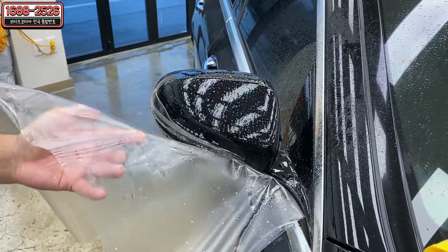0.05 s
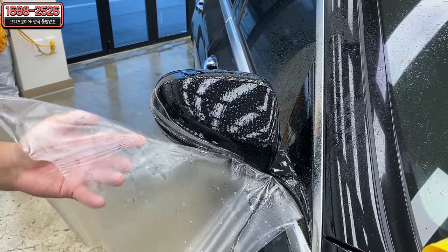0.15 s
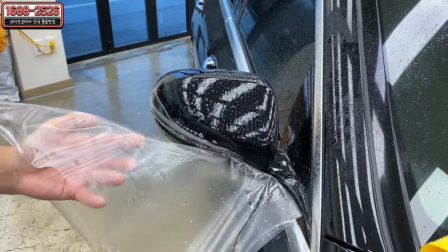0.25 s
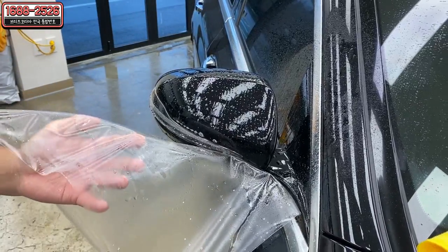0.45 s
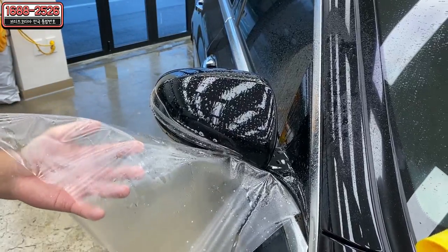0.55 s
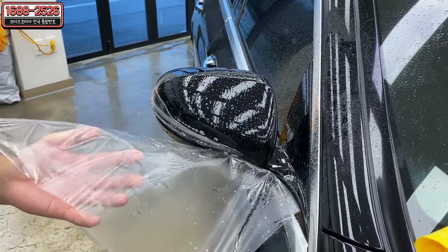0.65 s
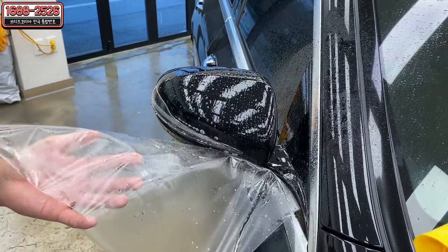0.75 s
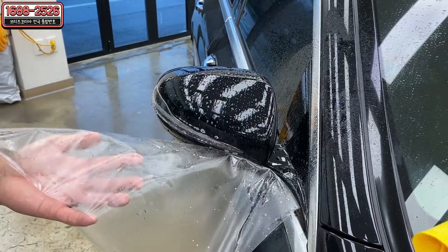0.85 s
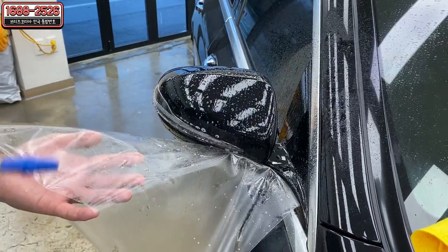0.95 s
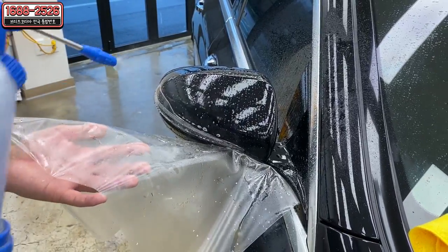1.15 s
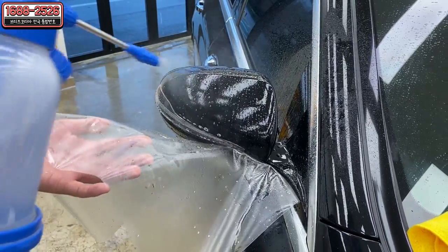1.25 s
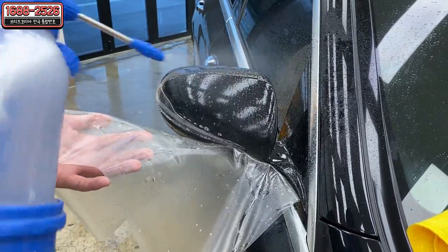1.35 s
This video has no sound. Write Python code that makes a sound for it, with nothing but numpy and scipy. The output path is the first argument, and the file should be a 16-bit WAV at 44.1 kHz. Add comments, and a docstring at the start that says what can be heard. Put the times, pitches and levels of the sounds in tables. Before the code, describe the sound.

Left of two close microphones, taut wet film pops twice and rustles with sharp ticks. The hall rings out over faint ventilation rumble, small soft flaps follow, and finally a spray hiss swells.

```python
"""A sheet of wet plastic film, pulled taut over a car door, pops twice, crinkles, rustles and softly flaps.
Pops are falling sweeps; creases and flaps are short sinking rings; wrinkles are filtered random clicks.
The place is a large, hard-walled workshop whose hall rings out as decaying noise; the film is to the left
of two microphones. Near the end a spray bottle starts to hiss as swelling filtered noise.
Ventilation rumble and faint hiss, both filtered noise, lie under everything."""
import sys
import numpy as np
from scipy import signal
from scipy.fft import rfft, irfft
from scipy.io import wavfile

SR = 44100
rng = np.random.default_rng(int(sys.argv[2]) if len(sys.argv) > 2 else 0)


def output_pcm(signal):
    """Save a mono or channel-first signal as 16-bit PCM at the path in sys.argv[1].

    Samples are clipped to [-1, 1] before scaling.
    """
    pcm = np.clip(np.atleast_2d(signal).T, -1, 1) * 32767
    wavfile.write(sys.argv[1], SR, np.round(pcm).astype(np.int16))


N = 61739
T = np.arange(N) / SR
HZ = np.maximum(np.fft.rfftfreq(2 * N, 1 / SR), 1)


def from_db(db):
    """Decibels to gain."""
    return 10 ** (np.asarray(db) / 20)


def rms_one(x):
    """Scale to unit power."""
    return x / np.sqrt(np.mean(x ** 2) + 1e-20)


def level(rows):
    """Gain over time from (time [s], level [dB]) rows."""
    return from_db(np.interp(T, *np.transpose(rows)))


def at_hz(points):
    """Read a table on a log-frequency axis."""
    f, value = np.transpose(points)
    return np.interp(np.log(HZ), np.log(f), value)


def shaped(x, gain):
    """Filter by a gain for each frequency."""
    return irfft(rfft(x, 2 * N) * gain)[..., :N]


def panned(db):
    """Left and right gains for a level difference."""
    return from_db(np.array([[.5], [-.5]]) * db)


def stereo_noise(likeness):
    """White noise whose two sides are alike as far as the table says."""
    alike = np.clip(at_hz(likeness), -.99, .99)
    mid, side = rng.standard_normal((2, N))
    mid = shaped(mid, np.sqrt((1 + alike) / 2))
    side = shaped(side, np.sqrt((1 - alike) / 2))
    return np.array([mid + side, mid - side])


def burst(start, decay, hz, q):
    """A dying run of tiny slips in one broad band; power 1 over its decay time."""
    age = np.maximum(T - start, 0)
    slips = rng.choice([-1, 1], N) * (age > 0) * np.exp(-np.minimum(age / decay, 20))
    half_width = np.exp(.5 / q)
    edges = np.clip([hz / half_width, hz * half_width], 20, SR / 2 - 20)
    band = signal.butter(2, edges, "band", fs=SR, output="sos")
    ring = signal.sosfilt(band, slips + 1e-18)
    return ring * np.sqrt(decay * SR / np.sum(ring ** 2))


# ventilation spectrum: (frequency [Hz], level [dB per Hz])
VENT_COLOUR = [(20, -8), (35, -7), (52, 3), (80, 2.5), (108, -1), (150, -15), (300, -21), (500, -20.5),
               (900, -50), (2000, -38), (8000, -48)]
VENT_DB = -54.5
# faint hiss spectrum: (frequency [Hz], level [dB per Hz])
AIR_COLOUR = [(60, 2), (200, 9.5), (1000, 3.5), (3000, -1.5), (6000, -3.5), (8300, -4), (10000, -4.5),
              (12000, -4.5), (14000, -6.5), (16000, -21)]
# faint hiss over time: (time [s], level [dB])
AIR_LEVEL = [(0, -58), (.19, -67), (.5, -59.5), (1.0, -58), (1.4, -63.5)]
# likeness of the two microphones, for the background and the hall: (frequency [Hz], likeness [-1 to 1])
HALL_LIKENESS = [(60, 1), (150, 0.92), (300, 0.66), (600, 0.0054), (1100, -0.069), (1700, 0.16),
                 (2200, 0.45), (3000, -0.2), (4400, 0.45), (5400, 0.15), (6600, 0.17), (9000, 0.21),
                 (14000, 0.73)]


def background():
    """Ventilation rumble and a faint hiss, both noise spread across the two microphones."""
    vent = rms_one(shaped(stereo_noise(HALL_LIKENESS), from_db(at_hz(VENT_COLOUR))))
    air = rms_one(shaped(stereo_noise(HALL_LIKENESS), from_db(at_hz(AIR_COLOUR))))
    return from_db(VENT_DB) * vent + level(AIR_LEVEL) * air


SPRAY_START_S, SPRAY_ATTACK_S = 1.2384, 0.026
SPRAY_DB, SPRAY_SWELL_DB_PER_S = -45, 14.5
# spray spectrum: (frequency [Hz], level [dB per Hz])
SPRAY_COLOUR = [(120, -11), (300, -9), (520, -1), (780, 3.5), (1100, -2), (2300, 0.5), (3500, -1.5),
                (4700, -4), (7500, -1.5), (9500, 1.5), (12000, -3.5), (15000, -2.5), (16000, -21)]
# spray place between the microphones: (frequency [Hz], left over right [dB])
SPRAY_PAN = [(300, 0), (800, 7), (1300, 4), (2400, 2), (3450, 6), (4400, 2.5), (5400, 2.5), (6600, 0.5),
             (15000, 0)]
# likeness of the spray at the two microphones: (frequency [Hz], likeness [-1 to 1])
SPRAY_LIKENESS = [(300, 0.54), (900, 0.74), (1600, 0), (2100, 0.4), (3200, -0.5), (4300, 0.85), (5100, .25),
                  (6600, 0.79), (14000, 1)]


def spray():
    """The valve opens and a smooth, swelling jet of mist hisses from the nozzle."""
    age = np.maximum(T - SPRAY_START_S, 0)
    opening = np.minimum(age / SPRAY_ATTACK_S, 1)
    flow = opening * from_db(SPRAY_DB + SPRAY_SWELL_DB_PER_S * age)
    colour = from_db(at_hz(SPRAY_COLOUR)) * panned(at_hz(SPRAY_PAN))
    return flow * rms_one(shaped(stereo_noise(SPRAY_LIKENESS), colour))


# reverberation time of the hall: (frequency [Hz], fall by 60 dB [s])
HALL_T60 = [(100, 0.6), (250, 0.83), (500, 1.1), (1200, 1.16), (2800, 1.08), (5500, 1.0), (9000, 0.57),
            (15000, 1.5)]
# hall spectrum: (frequency [Hz], level [dB])
HALL_COLOUR = [(60, 4.5), (150, 1.5), (350, -7), (610, 2.5), (800, -2), (1180, -0.5), (1450, 1), (1900, 3),
               (2250, 1.5), (2680, 1), (3200, 2), (4000, -1.5), (5200, 1), (7000, 0), (14000, -10)]
# hall balance at the microphones: (frequency [Hz], left over right [dB])
HALL_PAN = [(100, -2), (300, 0), (700, 2.5), (1700, 0), (2700, 2), (3500, 0), (5000, 4.5), (7000, 1.5),
            (9000, 0)]
HALL_BUILD_S = 0.0092


def hall(x):
    """A diffuse tail that builds up quickly and dies at its own rate in each band."""
    noise, response = rfft(stereo_noise(HALL_LIKENESS), 2 * N), 0
    centres, t60s = np.transpose(HALL_T60)
    for share, t60 in zip(np.eye(len(centres)), t60s):
        # neighbouring bands crossfade on the log-frequency axis
        band = irfft(noise * np.interp(np.log(HZ), np.log(centres), share))[:, :N]
        decay = np.exp(-np.log(1000) * T / t60) * (1 - np.exp(-T / HALL_BUILD_S))
        response = response + band * decay / np.sqrt(np.sum(decay ** 2))
    colour = from_db(at_hz(HALL_COLOUR)) * panned(at_hz(HALL_PAN))
    return shaped(x, rfft(response, 2 * N) * colour)


def grains(curve, colour, per_s, spread_db):
    """Small wrinkles click at random times, with random sizes and signs."""
    sizes = from_db(spread_db * np.minimum(rng.exponential(1, N), 3)) * rng.choice([-1, 1], N)
    clicks = sizes * (rng.random(N) < per_s / SR)
    return level(curve) * rms_one(shaped(clicks, from_db(at_hz(colour))))


# the film rustles as it moves: (time [s], level [dB])
RUSTLE = [(.195, -73), (.205, -32), (.26, -58), (.28, -39.5), (.32, -44.5), (.375, -39), (.41, -39.5),
          (.47, -53), (.62, -73), (.8, -75)]
# rustle spectrum: (frequency [Hz], level [dB per Hz])
RUSTLE_COLOUR = [(25, -25), (55, -9), (100, 8), (150, 5), (195, 6), (280, 1.5), (400, 1.5), (700, -2.5),
                 (1200, 5), (2000, -11), (3200, -12.5), (5000, -14), (7000, -18), (9500, -11.5),
                 (12000, -36), (16000, -52)]
# fine sizzle of the wet film: (time [s], level [dB])
SIZZLE = [(.31, -81), (.34, -54), (.365, -47), (.397, -42.5), (.42, -52), (.47, -74), (.6, -71)]
# sizzle spectrum: (frequency [Hz], level [dB per Hz])
SIZZLE_COLOUR = [(300, -48), (2000, -24), (6000, -16), (9500, 9), (12000, 13.5), (14500, 9), (16000, 8.5)]
GRAINS_PER_S, GRAIN_SPREAD_DB = 5000, 1  # rustle and sizzle
# coarser crackle as the sheet crumples: (time [s], level [dB])
CRACKLE = [(.27, -75.5), (.285, -51), (.34, -43.5), (.385, -50), (.42, -55), (.52, -52), (.65, -70)]
# crackle spectrum: (frequency [Hz], level [dB per Hz])
CRACKLE_COLOUR = [(200, -16), (900, 0), (2700, 6), (4500, 1), (7000, -3.5), (10000, -11), (13000, -36)]
CRACKLES_PER_S, CRACKLE_SPREAD_DB = 140, 3.5


def wrinkles():
    """Dense clicks blur into rustle and sizzle; sparse ones crackle."""
    rustle = grains(RUSTLE, RUSTLE_COLOUR, GRAINS_PER_S, GRAIN_SPREAD_DB)
    sizzle = grains(SIZZLE, SIZZLE_COLOUR, GRAINS_PER_S, GRAIN_SPREAD_DB)
    crackle = grains(CRACKLE, CRACKLE_COLOUR, CRACKLES_PER_S, CRACKLE_SPREAD_DB)
    return rustle + sizzle + crackle


FLIP_RISE = 0.28  # rise time as a share of the decay


def flip(start, decay, hz, rough, fall, q):
    """A patch of film buckles: a short ring that sinks to its pitch, mixed with rough slips."""
    age = np.maximum(T - start, 0) / decay
    dying = np.exp(-np.minimum(age, 30))
    pitch = (age > 0) * hz * 2 ** (fall * dying ** 2)
    tone = np.sin(2 * np.pi * np.cumsum(pitch) / SR) * dying * (1 - np.exp(-age / FLIP_RISE))
    ring = tone * np.sqrt((1 - rough) * decay * SR / np.sum(tone ** 2))
    return ring + np.sqrt(rough) * burst(start, decay, hz, q)


# slack film flaps softly:
# (time [s], level [dB], pitch [Hz], decay [s], level of the tick [dB], pitch of the tick [Hz])
FLAPS = [(0.2338, -33.5, 340, .004, -44, 1200), (.3065, -29, 376, 0.007, -37, 1510),
         (.598, -38.5, 642, .0045, -43, 1210), (.606, -41.5, 570, 0.0036, -46, 4840),
         (.9978, -44.5, 563, 0.0017, -53, 1820), (1.0482, -59, 590, .004, -51, 1300),
         (1.0675, -49.5, 474, .0042, -61, 990), (1.084, -55.5, 560, .004, -67, 1200),
         (1.129, -54, 491, 0.012, -55, 1900), (1.1925, -54.5, 544, 0.0038, -60, 1090)]
FLAP_ROUGH, FLAP_FALL_OCTAVES, FLAP_Q = 0.26, 0.33, 1.02
FLAP_TICK_S, FLAP_TICK_Q = 0.0036, 1.34


def flaps():
    """Dull, sinking plops with a broad tick on top."""
    out = 0
    for s, db, hz, decay, tick_db, tick_hz in FLAPS:
        out = out + from_db(db) * flip(s, decay, hz, FLAP_ROUGH, FLAP_FALL_OCTAVES, FLAP_Q)
        out = out + from_db(tick_db) * burst(s, FLAP_TICK_S, tick_hz, FLAP_TICK_Q)
    return out


# creases flip:
# (time [s], level [dB], pitch [Hz], decay [s], roughness [0-1], fall of the pitch [octaves])
CREASES = [(.2103, -28.5, 6600, .0007, .35, .7), (.2352, -26.5, 6600, .0008, .35, .7),
           (.2353, -40, 3270, .003, .2, 0), (.2564, -41, 7200, .001, .6, .2),
           (.2896, -32, 7100, .0013, .6, .2), (.2962, -28, 1050, .0016, .4, .3),
           (.3097, -25.5, 2200, .0005, .3, .6), (.3372, -34, 2800, .001, .4, .3),
           (.3436, -33.5, 8400, .0026, .8, .2), (.3462, -33.5, 6800, .0012, .6, .3),
           (.3594, -37, 9200, .0019, .7, .1), (.3702, -39.5, 4000, .0027, .9, .3),
           (.3822, -39, 9500, .001, .6, .2), (.3952, -31.5, 11500, .00092, .7, .2),
           (.3958, -25.5, 2600, .0019, .15, .2), (1.0480, -50.5, 1450, .003, .15, .8)]
CREASE_Q = 1.86  # sharpness of the rough part


def creases():
    """Sharp ticks of buckling film, each with its own pitch."""
    out = 0
    for s, db, hz, decay, rough, fall in CREASES:
        out = out + from_db(db) * flip(s, decay, hz, rough, fall, CREASE_Q)
    return out


SHUDDER_START_S, SHUDDER_DB, SHUDDER_DECAY_S = .279, -36, 0.047
SHUDDER_HZ, SHUDDER_Q = 384, 1.2


def shudder():
    """The taut sheet trembles for a moment after the big pop, as a rough, low, dying burst."""
    return from_db(SHUDDER_DB) * burst(SHUDDER_START_S, SHUDDER_DECAY_S, SHUDDER_HZ, SHUDDER_Q)


# the film pops taut: (time [s], relative level [dB], brightness [dB per octave],
# level of the crack [dB], bending delay at 1 kHz [s], rebound delay [s])
POPS = [(0.1984, 2.4, -2, -42, .0029, 0.00168), (0.2668, 9.5, -1.13, -27.5, .0028, .00156)]
# pop spectrum before the brightness: (frequency [Hz], relative level [dB])
POP_COLOUR = [(60, -17), (140, -10.5), (260, -3), (460, -1.5), (620, -18), (800, -10.5), (1000, -9.5),
              (1180, -3), (1480, -14), (1750, -8), (2100, -20.5), (2700, -20.5), (3300, -18.5), (4000, -20),
              (5000, -20), (5600, -27), (7000, -26.5), (9000, -27.5), (15000, -58)]
CRACK_DELAY_S, CRACK_S, CRACK_HZ, CRACK_Q = 0.0011, 0.0038, 3450, 1.53
# fine treble of a pop, relative to its level
SPIT_DB, SPIT_S, SPIT_HZ, SPIT_Q = -47.5, 0.0036, 10200, 1.6
# the treble of a pop comes back from the edge of the sheet
REBOUND_DB, REBOUND_ABOVE_HZ = -1, 3000


def pops():
    """Each pop is a crack and a bending wave whose treble arrives first, so it falls in pitch, then rebounds."""
    out = 0
    for s, db, tilt_db, crack_db, bend_s, rebound_s in POPS:
        # this phase delays each frequency by s + bend_s * sqrt(1000 / HZ)
        cycles = HZ * s + 2 * bend_s * np.sqrt(1000 * HZ)
        gain = 5 * from_db(db + at_hz(POP_COLOUR) + tilt_db * np.log2(HZ / 500))
        treble = 1 / (1 + (REBOUND_ABOVE_HZ / HZ) ** 4)
        rebound = from_db(REBOUND_DB) * treble * np.exp(-2j * np.pi * HZ * rebound_s)
        out = out + irfft(gain * (1 + rebound) * np.exp(-2j * np.pi * cycles))[:N]
        crack_s = s + CRACK_DELAY_S
        out = out + from_db(crack_db) * burst(crack_s, CRACK_S, CRACK_HZ, CRACK_Q)
        out = out + from_db(db + SPIT_DB) * burst(crack_s, SPIT_S, SPIT_HZ, SPIT_Q)
    return out


# film place between the microphones: (frequency [Hz], left over right [dB])
FILM_PAN = [(100, 2.5), (300, 1.5), (600, 6.5), (1100, 0.5), (2200, 12.5), (4200, 7.5), (8000, 2),
            (15000, -0.5)]
FILM_LAG_S = 0.0002976  # the film is to the left, so the right side lags
PORT_KNEE_HZ, PORT_LEAD_S = 6524, 0.000278  # above the knee the right port leads, whatever the direction
CREASE_HALL_DB, FLAP_HALL_DB = -1, -11  # sends to the hall


def film():
    """The sheet, nearer to the left microphone, and its echo in the hall."""
    clicks = wrinkles()
    pull = pops() + shudder() + clicks
    ticks, plops = creases(), flaps()
    # the lag's phase stops growing at the knee
    lag_cycles = np.minimum(HZ, PORT_KNEE_HZ) * FILM_LAG_S * np.array([[0], [1]])
    lag = np.exp(-2j * np.pi * lag_cycles)
    direct = shaped(pull + ticks + plops, panned(at_hz(FILM_PAN)) * lag)
    return direct + hall(pull + from_db(CREASE_HALL_DB) * ticks + from_db(FLAP_HALL_DB) * plops)


def scene():
    """Film, spray and workshop together."""
    return film() + spray() + background()


LOW_CUT_HZ, CUTOFF_HZ = 35, 16000  # the microphone's bass roll-off; the steep top cut


def record(dry):
    """The two microphone ports turn the treble out of step; deep bass rolls off and the top is cut steeply."""
    lead_cycles = np.maximum(HZ - PORT_KNEE_HZ, 0) * PORT_LEAD_S * np.array([[0], [1]])
    ports = np.exp(2j * np.pi * lead_cycles)
    losses = np.sqrt((1 + (LOW_CUT_HZ / HZ) ** 8) * (1 + (HZ / CUTOFF_HZ) ** 300))
    return shaped(dry, ports / losses)


dry = scene()
out = record(dry)
output_pcm(out)
```